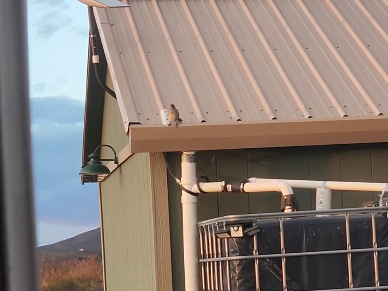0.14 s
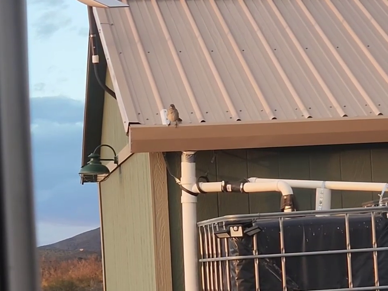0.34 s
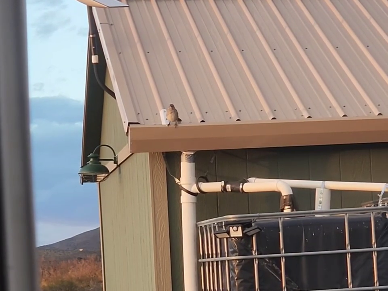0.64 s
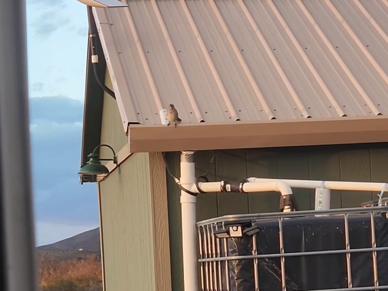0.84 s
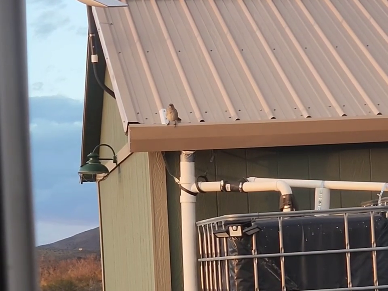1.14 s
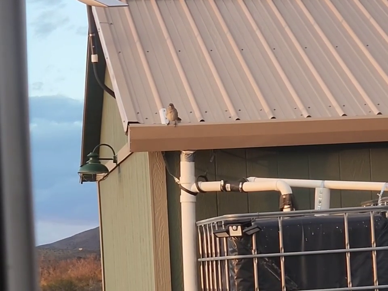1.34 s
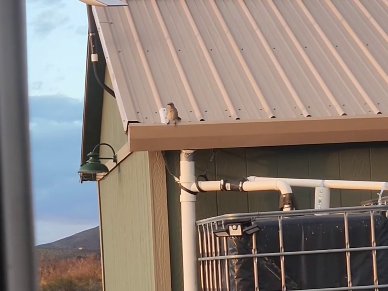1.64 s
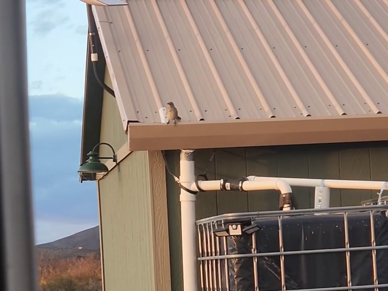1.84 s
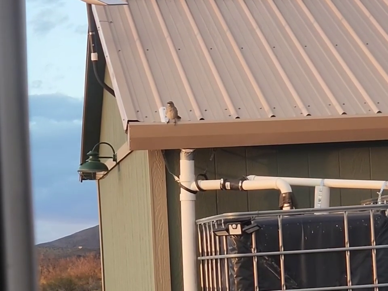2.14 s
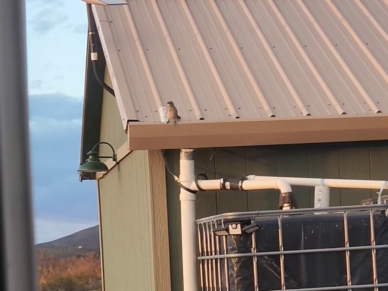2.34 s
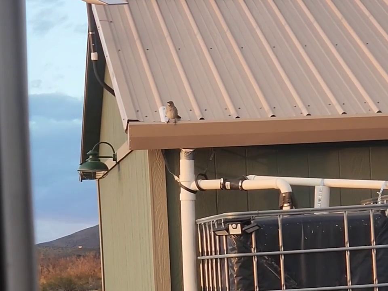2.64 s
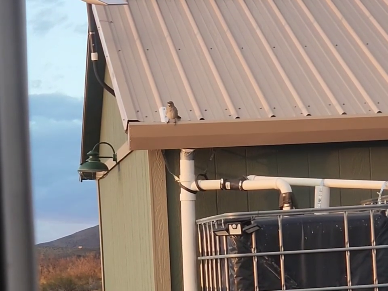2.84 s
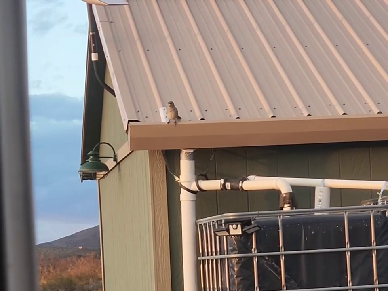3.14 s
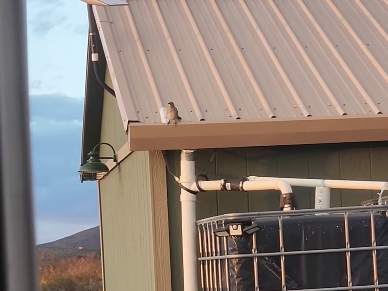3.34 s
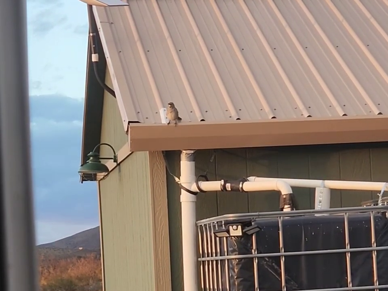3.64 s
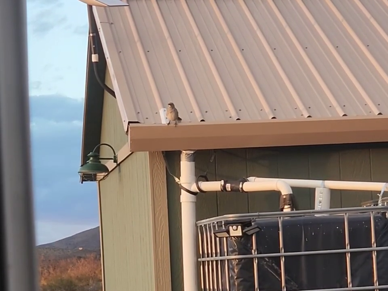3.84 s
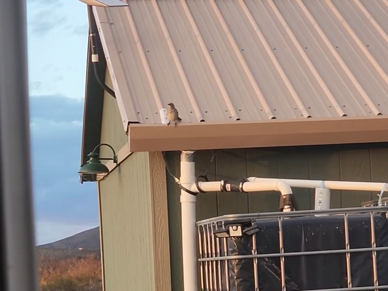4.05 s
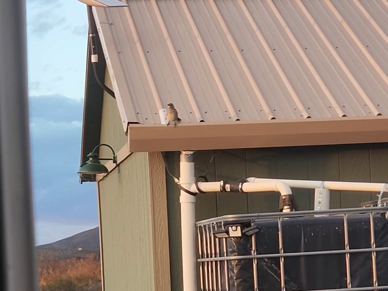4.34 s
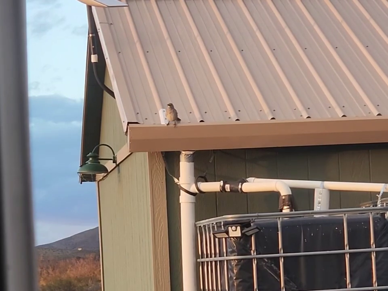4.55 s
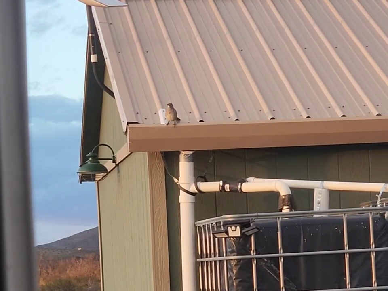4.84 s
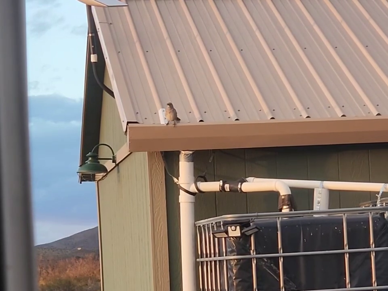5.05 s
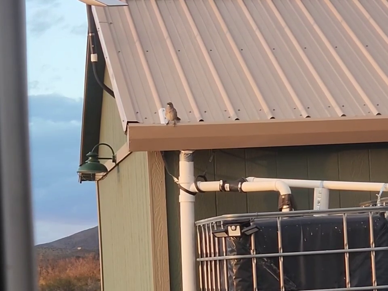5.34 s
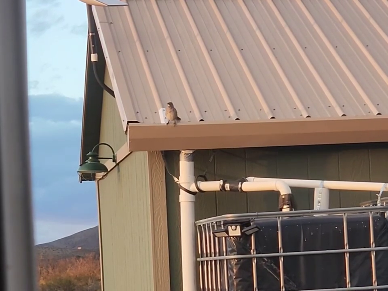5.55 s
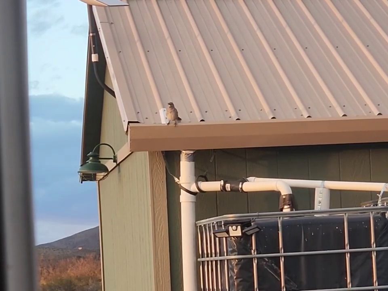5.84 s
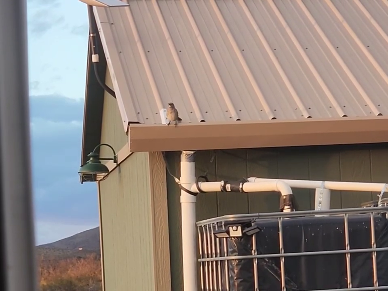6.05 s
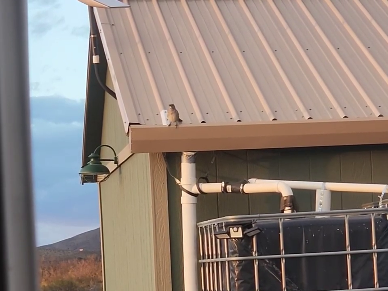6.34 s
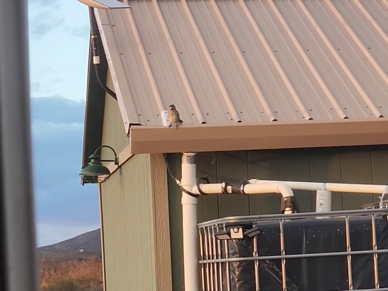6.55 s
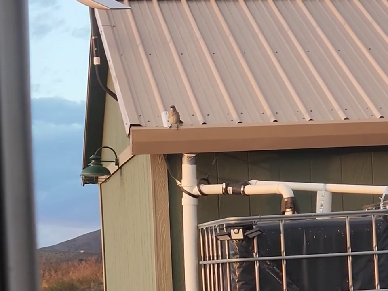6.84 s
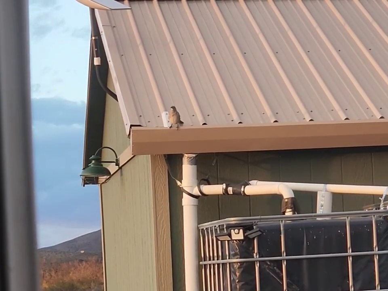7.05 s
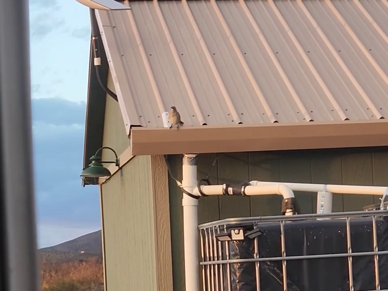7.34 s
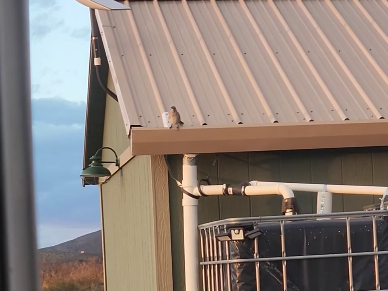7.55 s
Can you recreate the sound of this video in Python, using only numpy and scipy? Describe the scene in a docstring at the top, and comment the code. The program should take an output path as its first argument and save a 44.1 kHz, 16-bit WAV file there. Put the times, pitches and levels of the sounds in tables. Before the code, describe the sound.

Outdoors by a metal-roofed shed, wind rumbles low and unevenly on a handheld stereo microphone, over a faint 416 Hz motor hum and soft air. A thrasher starts with weak slurs and a thin high squeak at 0.2-0.5 s, then sparse short whistles; grip rustles and clicks come near 0.9 and 1.2. High peeps sound at 1.5 and 1.7, rising whistles at 2.0-2.3, tiny dry ticks at 2.4-2.55 and a strong slur at 2.9. A soft, low arched note follows at 3.1. Gusts thump as six quick flicks rattle at 3.45-3.8. From 4.25 come winding whistles and stuttered chatter; three hooked notes at 5.1-5.35 ring in calmer air. A sharp drop at 5.6, rising whistle at 5.9 and plunge at 6.05 follow, with a small rustle. A falling whistle and flick end the song near 6.65 amid gusts; then quiet hum remains until 7.7.

```python
"""A thrasher sings from the edge of a metal shed roof: gliding tones make its slurred whistles, hooked notes,
low notes, squeaks and a rattle, and short bursts of band noise surround some of its notes.
Delays and scattered reflections from the roof and nearby walls throw the song back.
Swelling low noise buffets the microphone as gusts, and the hand that holds it rustles, clicks and bumps.
Behind them a machine hums as wavering tones over a drone, in steady outdoor noise."""
import sys
import numpy as np
from scipy import signal
from scipy.fft import rfft, irfft, next_fast_len
from scipy.io import wavfile
from scipy.ndimage import uniform_filter1d

SR = 44100
rng = np.random.default_rng(int(sys.argv[2]) if len(sys.argv) > 2 else 0)


def int16_out(signal):
    """Quantize to a 16-bit WAV file."""
    q = np.round(np.clip(np.atleast_2d(signal).T, -1, 1) * 32767)
    wavfile.write(sys.argv[1], SR, q.astype(np.int16))


N = 338627  # samples
TIME = np.arange(N) / SR

# All song levels are at the beak, ahead of the reflections; spectra are in relative dB.
# Long, winding whistles, one curve each. Each row: time in seconds, pitch in Hz, level in dB.
WHISTLES = [
    [(4.278, 2115, -42), (4.286, 2000, -37.5), (4.296, 2246, -38.5), (4.316, 1966, -44),
     (4.334, 1890, -59.5), (4.364, 1997, -44.5), (4.402, 2360, -41), (4.42, 2524, -55)],
    [(5.795, 1395, -51), (5.841, 1338, -55), (5.859, 1657, -39), (5.879, 1976, -34), (5.913, 2192, -31),
     (5.941, 2197, -32), (5.961, 2264, -28), (5.978, 2445, -49)],
    [(6.535, 2456, -67), (6.543, 2472, -48), (6.555, 2216, -38.5), (6.565, 2247, -38.5), (6.573, 2026, -40),
     (6.609, 1575, -44.5), (6.633, 1608, -40.5), (6.645, 1450, -50.5)],
]
# One whistle that plunges from high to low. Each row: time in seconds, pitch in Hz, level in dB.
PLUNGE = [(6.022, 4150, -57), (6.028, 4030, -52), (6.048, 3626, -43.5), (6.066, 3485, -53.5),
          (6.075, 2470, -47), (6.086, 1695, -40.5), (6.099, 1482, -49.5), (6.169, 1383, -55.5)]
# Slurred notes; two that overlap come from the two sides of the syrinx.
# Each row: start in seconds, length in seconds, start, middle and end pitch in Hz, level in dB,
# place of the loudest moment (0-1), onset in dB, ending in dB.
SLURS = [(0.183, 0.079, 1566, 1900, 2020, -59.5, 0.13, -10, -12.5),
         (0.247, 0.081, 2013, 1924, 1930, -69, .1, -2, -3),
         (.325, 0.035, 1970, 2100, 1950, -65.5, .5, 1, 2),
         (0.417, 0.04, 2494, 2120, 1925, -60.5, 0.46, -21, -4.5),
         (0.826, .044, 1900, 1706, 1536, -50, 0.2, -15, -13),
         (0.973, 0.051, 1850, 1750, 1400, -53, .3, -9, -16),
         (1.503, 0.023, 2480, 2270, 2200, -58.5, .35, -8, -11),
         (1.928, 0.063, 1480, 2140, 2630, -49.5, 0.14, -8, -27),
         (2.034, 0.13, 1723, 1886, 1894, -48, 0.21, -18, -7.5),
         (2.178, 0.055, 1905, 1848, 1830, -50.5, .6, -15, -18),
         (2.279, .07, 1523, 2070, 2506, -37, 0.61, -13.5, -20),
         (2.508, 0.023, 3900, 3310, 3150, -67, 0.7, -6, -11),
         (2.568, 0.022, 4080, 3840, 3300, -75, 0.3, -7, -8),
         (2.822, 0.053, 1610, 1990, 2270, -51.5, 0.7, -4, 3),
         (2.844, 0.1, 1638, 2136, 1834, -36.5, 0.64, -21.5, -18),
         (4.245, .02, 1780, 1830, 2050, -55.5, .6, -9, -2),
         (4.258, .021, 1766, 1380, 2090, -45.5, 1, -9.5, 0.5),
         (4.418, 0.031, 2766, 3270, 3050, -59.5, 0.4, -0.5, -2),
         (4.454, 0.027, 3420, 3590, 3480, -61, .5, -6, -4),
         (4.46, 0.023, 3160, 2830, 2880, -54.5, .2, -2, -10),
         (4.603, 0.032, 1940, 2017, 2140, -63.5, .7, -6, -1),
         (4.65, 0.04, 2270, 2300, 2000, -56.5, 1, -16, -8),
         (4.652, 0.047, 1223, 1230, 1130, -57, .5, -11.5, -18),
         (4.674, 0.07, 1563, 1692, 1620, -40, 0.28, -12.5, -7),
         (4.728, 0.025, 1320, 1244, 1200, -59.5, .5, -6, -8),
         (4.955, 0.07, 3780, 2756, 2370, -48.5, 0.29, -24.5, -5.5),
         (4.965, 0.026, 1950, 2110, 2100, -62.5, .5, -11, -18),
         (5.021, .012, 2440, 3200, 4380, -45.5, .45, -11, -15),
         (5.597, 0.011, 1190, 1910, 3060, -44, 0.58, -19, -20),
         (5.613, .022, 2596, 1652, 1230, -36, 0.16, -16, -20),
         (5.722, 0.061, 2060, 2190, 2280, -69, .5, -0.5, -4),
         (5.779, 0.038, 3430, 3486, 3450, -66.5, 0, 1, -17),
         (5.912, .038, 5480, 5520, 5520, -69, .5, -4, -4),
         (6.158, .025, 2510, 2455, 2380, -58, 0, -3, -22.5),
         (6.513, 0.019, 2290, 2620, 2680, -61.5, .8, -7, -2.5)]
# Arched notes that end in an upward whip. Each row: start in seconds, length of the arch in seconds,
# pitch in Hz, level in dB, onset in dB, whip level in dB.
HOOKS = [(5.068, 0.06, 2253, -33, -8, -51.5), (5.171, .073, 1992, -37.5, -5.5, -48.5),
         (5.298, 0.059, 1943, -38.5, -0.5, -49)]
# The arch they share. Each row: share of the length, share of the pitch, level in dB.
HOOK_ARCH = [(0, 0.76, -20), (.17, .91, -3.5), (.54, 1, -4), (.82, .9, 2), (1.001, .88, -1.5)]
WHIP_S, WHIP_HZ, WHIP_FALL_S, WHIP_END_HZ = 0.0093, 3745, 0.0074, 2780  # rise to the top, then fall
# High peeps with a spike in pitch. Each row: time of the spike in seconds, pitch in Hz, level in dB.
PEEPS = [(1.485, 3344, -57.5), (1.723, 3466, -55.5)]
# The spike they share, and a second voice that drops away from it.
# Each row: seconds from the spike, share of the pitch, level in dB.
PEEP_VOICES = [
    [(-.058, .97, -8.5), (-.04, 1.01, -1.5), (-.022, .97, -5), (-.01, 1.15, 2), (0, 1.55, -7.5),
     (.012, 1.26, -6), (.023, 1.06, 2.5), (.042, 1.01, -13.5)],
    [(-.004, 1.3, -1), (.013, .79, -15.5)],
]
# Dry ticks, each a very fast upsweep with noise around it.
# Each row: middle in seconds, level in dB, top pitch in Hz.
UPSWEEPS = [(2.393, -59, 2800), (2.445, -57, 2800), (2.497, -59, 2900), (2.557, -63, 3600)]
SWEEP_S, SWEEP_FOOT_HZ, SWEEP_MID_HZ = .014, 1460, 2135
# Soft low notes, whose octave the throat lifts. Each row: start in seconds, length in seconds,
# start, middle and end pitch in Hz, level in dB, place of the loudest moment (0-1), onset and ending in dB.
LOW_NOTES = [(1.069, 0.14, 1060, 1211, 1170, -70, .4, -9, -6),
             (2.748, 0.087, 878, 1026, 1200, -68.5, 1, -9.5, 0.5),
             (3.077, .248, 861, 1266, 980, -56, .75, -20, -13)]
# Thin, fluttering squeaks. Each row: start in seconds, length in seconds,
# start, middle and end pitch in Hz, level in dB, place of the loudest moment (0-1), onset and ending in dB.
SQUEAKS = [(.362, 0.076, 6850, 7470, 8600, -47, .25, -20, -11.5),
           (5.149, 0.039, 6430, 6690, 7000, -57.5, .5, -10.5, -13),
           (5.153, .052, 7050, 7370, 7400, -69, .55, -11, -5)]
# Quick flicks up and down in pitch; six in a row make the rattle. Each row: time at the top in seconds,
# level in dB, length in seconds, top and foot pitch in Hz, surrounding noise in dB.
FLICKS = [(3.463, -40, .022, 2401, 1195, -44), (3.531, -40, 0.019, 2390, 1205, -47),
          (3.598, -38.5, .018, 2413, 1190, -43), (3.66, -41.5, 0.02, 2417, 1210, -43.5),
          (3.7285, -42, 0.021, 2425, 1178, -46), (3.804, -39.5, 0.02, 2413, 1187, -43),
          (4.738, -52.5, .032, 2352, 1947, -52.5), (6.651, -43.5, .022, 2210, 1292, -49)]
# Chatter, stuttered notes of both voices at once.
# Each row: time in seconds, upper pitch in Hz, its level in dB, lower pitch in Hz, its level in dB.
CHATTER = [(4.501, 3310, -59.5, 2310, -58), (4.523, 2930, -51.5, 1696, -50.5),
           (4.54, 2970, -56.5, 1738, -53), (4.559, 3000, -54.5, 1674, -54)]
# Strength of the octave: the throat rings near 2 kHz and lifts it for low notes only.
# Each row: pitch in Hz, octave in dB.
THROAT = [(850, 18.5), (980, 11), (1120, -0.5), (1200, -6), (1255, -6.5), (1400, -24.5), (1650, -28.5),
          (1950, -33), (2250, -41), (2600, -54.5), (3500, -32.5), (7500, -34)]
# The wider the beak opens, the more of the whistles' octave gets out.
# Each row: time in seconds, change of the octave in dB.
BEAK = [(1.1, -9.5), (1.4, -3), (1.7, 10), (1.9, -17.5), (4.5, -16.5), (4.65, -3.5), (5.1, 1), (6.0, -1.5),
        (6.5, -3.5)]
# Bursts of band noise around some notes.
# Each row: middle in seconds, level in dB, length in seconds, centre in Hz.
NOISE_BURSTS = [(1.966, -61.5, 0.058, 2090), (1.995, -71, .025, 2920), (2.338, -55, 0.074, 2130),
                (2.348, -66, .03, 2840), (4.435, -57, 0.046, 3000), (4.505, -60, 0.094, 3190),
                (4.51, -67, 0.11, 2320), (4.48, -70.5, .1, 3750), (5.626, -41.5, .056, 2010),
                (5.972, -68, .03, 3150), (6.539, -58, 0.036, 2550), (6.59, -63.5, 0.066, 2050)]
# Spectrum of the bursts. Each row: offset from the centre in Hz, density in dB per Hz.
BURST_SPECTRUM = [(-1500, -50.5), (-1050, -27.5), (-800, -12), (-300, 1), (102, 10.5), (413.5, -3.5),
                  (647.5, -26.5), (1404, -27.5), (1998.5, -50.5), (6005.5, -73.5)]
# The noise around flicks and upsweeps: its centre, its length per flick, its level and length per upsweep.
NOISE_HZ, FLICK_NOISE_STRETCH, SWEEP_NOISE_DB, SWEEP_NOISE_S = 2024, 1.7, -1, 0.027
# Reflections from roof and walls. Each row: delay left in seconds, delay right in seconds, level in dB.
ECHOES = [(.00211, 0.000832, -24), (.00413, .00388, -7), (.00617, 0.0071, -9), (.00821, 0.0076, -12),
          (.01617, .01476, -23), (.01871, 0.014, -17), (.0250, 0.032, -19), (.0650, 0.087, -27.5)]
NEAR_T60, FAR_T60 = .18, .5  # seconds for the scatter to die away
# Strong gusts at the microphone. Each row: middle in seconds, rumble in dB, length in seconds,
# flutter in dB, left minus right in dB.
GUSTS = [(.08, -35, .1, -48, -8.5), (0.187, -28, 0.083, -35.5, 7.5), (0.355, -29, 0.089, -35.5, 2),
         (0.521, -30, 0.11, -49.5, -2.5), (0.821, -44, 0.073, -53, 13), (1.05, -41, 0.38, -60.5, 11),
         (1.274, -29, .09, -46, 4.5), (1.51, -37.5, 0.059, -61, 9), (1.683, -37.5, 0.19, -61, 9),
         (1.895, -34, .13, -48, 4), (2.321, -43, .08, -60, 7.5), (2.488, -43.5, 0.053, -61, 11),
         (2.815, -40.5, 0.15, -62, 7.5), (3.041, -38, 0.12, -57, 10.5), (3.428, -35, 0.045, -51.5, 13),
         (3.521, -28, 0.081, -43, 9.5), (3.598, -29.5, 0.046, -53, -8.5), (3.718, -30.5, 0.06, -45, 10),
         (3.917, -30.5, 0.22, -45, 6), (4.182, -35.5, 0.038, -61, 11.5), (4.426, -38, 0.17, -50, 11.5),
         (6.046, -45, 0.1, -55, 8), (6.489, -37.5, 0.18, -50.5, 15.5), (6.629, -37.5, .08, -48, -4),
         (6.748, -36, 0.13, -38, 6), (6.937, -34, 0.15, -44.5, -0.5), (7.529, -53, 0.084, -68, 6)]
# Strength of the breeze at the microphone. Each row: time in seconds, rumble in dB.
BREEZE = [(0, -36), (.7, -46), (1.95, -43.5), (2.15, -54), (3.3, -47), (3.8, -41), (4.5, -52.5),
          (4.75, -56.5), (5.7, -63.5), (6.3, -49), (6.7, -34.5), (7.2, -60), (7.68, -60.5)]
# Flutter at 0 dB of rumble, its dB per dB of rumble, and left minus right in dB.
BREEZE_FLUTTER_DB, BREEZE_FLUTTER_SLOPE, BREEZE_LEFT_DB = -43.5, 0.48, 0.5
PUFF_HZ, PUFF_DB = 15, 2  # the breeze comes in random puffs, different at each port
# Spectrum of the wind's deep rumble. Each row: frequency in Hz, density in dB per Hz.
RUMBLE_SPECTRUM = [(10, -38.5), (22, -7), (43, 4.5), (66, 2.5), (95, -7.5), (125, -27.5), (250, -81.5),
                   (900, -140)]
# Spectrum of the wind's quicker flutter. Each row: frequency in Hz, density in dB per Hz.
FLUTTER_SPECTRUM = [(60, -29.5), (90, -1.5), (112, -1.5), (140, -9.5), (190, -19.5), (260, -32.5),
                    (400, -39), (900, -72.5), (3000, -130)]
# Rustles of the hand on the microphone. Each row: middle in seconds, level in dB, length in seconds.
RUSTLES = [(0.872, -77, 0.2), (1.10, -77, .07), (1.204, -71.5, 0.07), (1.273, -68, 0.088),
           (1.725, -78, 0.12), (6.028, -62.5, 0.017), (6.067, -59.5, 0.03), (6.094, -70.5, 0.16)]
# Spectrum of rustles and clicks. Each row: frequency in Hz, density in dB per Hz.
RUSTLE_SPECTRUM = [(200, 7.5), (700, 0.5), (1500, 7), (3500, -6.5), (5300, -1.5), (6300, -17), (8700, -7),
                   (10300, -19.5), (12500, -11.5), (16000, -15.5)]
# Small clicks of the grip. Each row: start in seconds, level in dB.
GRIP_CLICKS = [(0.2008, -80), (0.854, -80), (.897, -71), (1.21, -67), (1.231, -62), (1.276, -66),
               (6.39, -69), (6.832, -76)]
# Low bumps on the microphone. Each row: middle in seconds, peak level in dB, pitch in Hz.
BUMPS = [(0.35, -41, 86), (0.358, -39, 192), (.853, -51.5, 855), (0.895, -54.5, 835), (1.232, -64, 850),
         (1.276, -60, 810), (2.312, -41, 55), (6.028, -45.5, 48.4)]
# Machine tones. Each row: frequency in Hz, level in dB, width of the wavering in Hz.
HUM = [(416, -58.5, 0.26), (359.7, -67.5, 7.4), (125, -70.5, 8), (793, -88.5, 7.7)]
# Spectrum of the machine's drone. Each row: frequency in Hz, density in dB per Hz.
DRONE_SPECTRUM = [(25, -9), (60, -3), (130, -4.5), (200, -13), (300, -9.5), (400, -7), (500, -23),
                  (700, -30), (1200, -68)]
# Spectrum of the steady outdoor background. Each row: frequency in Hz, density in dB per Hz.
AIR_SPECTRUM = [(280, -33), (480, -0.5), (620, -10), (800, -12), (1100, -17), (1600, -16.5), (2500, -24.5),
                (3500, -25), (5500, -28.5), (6100, -34), (9200, -35.5), (10300, -41), (12000, -34.5),
                (16000, -33.5)]
AIR_DB = -72
EDGE_HZ = 15750  # top of the recorder's band


def bird():
    """The whole song, close to the beak: the sum of tones from both sides of the syrinx."""
    song = np.zeros(N)
    for rows in whistled():
        beak_db = np.interp(rows[0][0], *np.transpose(BEAK))
        add(song, *syllable(rows, flutter=.005, flutter_hz=250, beak_db=beak_db))
    for row in LOW_NOTES:
        beak_db = np.interp(row[0], [1.1, 2.7], [-6, 1])
        add(song, *syllable(slur(*row, flatness=3), flutter=.002, flutter_hz=150, beak_db=beak_db))
    for row in SQUEAKS:
        s, squeak = syllable(slur(*row), flutter=0.011, flutter_hz=495.5)
        add(song, s, squeak)
        add(song, s + .072, amp(-17) * squeak)  # high notes beam at a far wall and come back
    for *row, _ in FLICKS:
        add(song, *syllable(flick(*row), flutter=0.011, flutter_hz=510, beak_db=-16.5))
    for s, upper_hz, upper_db, lower_hz, lower_db in CHATTER:
        add(song, *syllable(stutter(s, upper_hz, upper_db), flutter=0.046, flutter_hz=700))
        add(song, *syllable(stutter(s, lower_hz, lower_db), flutter=0.018, flutter_hz=700))
    return song


def syllable(rows, flutter, flutter_hz, beak_db=0, fade_s=0.0029):
    """One side of the syrinx: a gliding, slightly unsteady tone and its octave; returns start and sound."""
    s, pitch, level_db = np.transpose(rows)
    s = np.sort(s)
    t = np.arange(s[0] - fade_s, s[-1] + fade_s, 1 / SR)
    glide = uniform_filter1d(np.interp(t, s, pitch), size=130)  # rounds the corners
    hz = glide * (1 + flutter * wander(len(t), flutter_hz))
    phase = 2 * np.pi * np.cumsum(hz) / SR
    octave = amp(read(THROAT, hz) + beak_db) * np.sin(2 * phase)
    tone = np.sqrt(2) * (np.sin(phase) + octave)
    to_edge = np.minimum(t - t[0], t[-1] - t)
    gate = np.sin(np.pi / 2 * np.clip(to_edge / (2 * fade_s), 0, 1)) ** 2
    return t[0], gate * amp(np.interp(t, s, level_db)) * tone


def whistled():
    """The contours of all the clear notes, each as rows of time, pitch and level."""
    peeps = []
    for s, hz, db in PEEPS:
        for voice in PEEP_VOICES:
            peeps.append([(s + lag, share * hz, db + voice_db) for lag, share, voice_db in voice])
    sweeps = [slur(s - SWEEP_S / 2, SWEEP_S, SWEEP_FOOT_HZ, SWEEP_MID_HZ, top_hz, db,
                   loudest=0.56, onset_db=-9, ending_db=-13)
              for s, db, top_hz in UPSWEEPS]
    slurs = [slur(*row) for row in SLURS]
    hooks = [hook(*row) for row in HOOKS]
    return [*WHISTLES, PLUNGE] + slurs + hooks + peeps + sweeps


def slur(s, length, start_hz, middle_hz, end_hz, db, loudest, onset_db, ending_db, flatness=2):
    """The contour of a note that glides along one bow while its level follows an onset and an ending."""
    u = np.linspace(0, 1, 41)
    bow = (middle_hz - (start_hz + end_hz) / 2) * (1 - abs(2 * u - 1) ** flatness)
    loudest = np.clip(loudest, .03, .97)
    onset = onset_db * (1 - u / loudest) ** 2
    ending = ending_db * ((u - loudest) / (1 - loudest)) ** 2
    fade = np.where(u < loudest, onset, ending)
    return np.transpose([s + u * length, start_hz + u * (end_hz - start_hz) + bow, db + fade])


def hook(s, length, hz, db, onset_db, whip_db):
    """The contour of an arched note whose pitch whips up at its close and falls back."""
    arch = [(s + u * length, share * hz, db + arch_db + onset_db * (1 - u)) for u, share, arch_db in HOOK_ARCH]
    top = s + length + WHIP_S
    return arch + [(top, WHIP_HZ, whip_db), (top + WHIP_FALL_S, WHIP_END_HZ, whip_db)]


def flick(s, db, length, top_hz, foot_hz, foot_db=-12):
    """The contour of one flick: pitch straight up and down again."""
    half_hz = (foot_hz + top_hz) / 2
    return [(s - length / 2, foot_hz, db + foot_db), (s - length / 4, half_hz, db), (s, top_hz, db),
            (s + length / 4, half_hz, db), (s + length / 2, foot_hz, db + foot_db)]


def stutter(s, hz, db, half_s=0.0037, lift=1.15, edge_db=-8):
    """The contour of one chatter note: a quick drop in pitch, then a hold, loudest where the drop ends."""
    return [(s - half_s, hz * lift, db + edge_db), (s, hz, db), (s + half_s, hz, db + edge_db)]


def note_noise():
    """Short swells of band noise surround the flicks, upsweeps and some other notes."""
    out = np.zeros((2, N))
    for s, db, length, centre_hz in noise_moments():
        t = np.arange(-2 * length, 2 * length, 1 / SR)
        swell = np.exp(-(2 * t / length) ** 2)
        unevenness = evened(amp(1.1 * wander(len(t), 180)))  # the noise flutters unevenly
        band = [(max(centre_hz + offset_hz, 1), band_db) for offset_hz, band_db in BURST_SPECTRUM]
        add(out, s + t[0], amp(db) * swell * unevenness * noise(band, likeness=0.22, n=len(t)))
    return out * panned(1.3)


def noise_moments():
    """Every burst of band noise: (middle in seconds, level in dB, length in seconds, centre in Hz)."""
    flicks = [(s, noise_db, FLICK_NOISE_STRETCH * length, NOISE_HZ) for s, _, length, _, _, noise_db in FLICKS]
    sweeps = [(s, db + SWEEP_NOISE_DB, SWEEP_NOISE_S, NOISE_HZ) for s, db, _ in UPSWEEPS]
    return NOISE_BURSTS + flicks + sweeps


def yard(song, direct_db=-1, near_db=-16, far_db=-32):
    """The direct path, single reflections, scatter from the shed and a faint tail from the land around."""
    near = amp(near_db) * scatter(NEAR_T60, start_s=0.0056)
    far = amp(far_db) * scatter(FAR_T60, start_s=0.029)
    response = near + far
    response[[0, 1], [0, 3]] += amp(direct_db)  # reaches the right port three samples later
    for left_s, right_s, db in ECHOES:
        response[0, round(left_s * SR)] += amp(db)
        response[1, round(right_s * SR)] += amp(db)
    return signal.fftconvolve(song[None], response, axes=1)[:, :N] * panned(1.4)


def scatter(t60, start_s):
    """A decaying tail of sparse reflections of energy 1, different in each channel."""
    t = np.arange(SR // 2) / SR
    signs = rng.choice([-1., 1.], (2, len(t)))
    taps = signs * (rng.random((2, len(t))) < 3000 / SR)  # about 3000 reflections a second
    taps = taps * amp(-60 * t / t60) * (t > start_s)
    return taps / np.linalg.norm(taps, axis=1, keepdims=True)


def wind():
    """A puffy breeze and single gusts drive a deep rumble and a quicker flutter, uneven between the ports."""
    breeze_db = np.interp(TIME, *np.transpose(BREEZE))
    puffs = amp(PUFF_DB * np.array([wander(N, PUFF_HZ), wander(N, PUFF_HZ)])) * panned(BREEZE_LEFT_DB)
    rumble_power = (puffs * amp(breeze_db)) ** 2
    flutter_power = (puffs * amp(BREEZE_FLUTTER_DB + BREEZE_FLUTTER_SLOPE * breeze_db)) ** 2
    for s, rumble_db, length, flutter_db, left_db in GUSTS:
        gust = (swells([(s, 0, length)]) * panned(left_db)) ** 2
        rumble_power += amp(rumble_db) ** 2 * gust
        flutter_power += amp(flutter_db) ** 2 * gust
    rumble = np.sqrt(rumble_power) * eddies(RUMBLE_SPECTRUM, likeness=0.54)
    flutter = np.sqrt(flutter_power) * eddies(FLUTTER_SPECTRUM, likeness=0.29)
    return rumble + flutter


def eddies(spectrum, likeness):
    """Turbulence at the two microphone ports, without a slow swell of its own."""
    swirl = noise(spectrum, likeness)
    return swirl / np.sqrt(uniform_filter1d(swirl.mean(0) ** 2, size=4000))


def hand():
    """Grip on the microphone: grainy noise rustles, tiny decaying clicks and dull bumps of a few turns."""
    rub = swells(RUSTLES) * amp(2.0 * wander(N, 150))
    for s, db in GRIP_CLICKS:
        add(rub, s, amp(db) * np.exp(-TIME[:2000] / 0.0038))
    out = noise(RUSTLE_SPECTRUM, likeness=.3) * rub * panned(1.5)
    for s, db, hz in BUMPS:
        turns = np.arange(-2, 2, hz / SR)
        add(out, s - 2 / hz, -amp(db) * np.cos(2 * np.pi * turns) * np.exp(-(turns / 1.2) ** 2))
    return out


def machine():
    """A steady motor tone and weaker wavering ones over a low drone of noise."""
    tones = np.zeros(N)
    for hz, db, width in HUM:
        phase = 2 * np.pi * np.cumsum(hz + width * wander(N, 12)) / SR
        tones += amp(db) * np.sqrt(2) * np.sin(phase)
    return tones * panned(-0.55) + amp(-60) * noise(DRONE_SPECTRUM, likeness=0.6)


def air():
    """The steady outdoor background: shaped noise, nearly unlike in the two channels."""
    return amp(AIR_DB) * noise(AIR_SPECTRUM, likeness=0.035)


def noise(spectrum, likeness, n=N):
    """Two partly alike channels of noise with the given spectrum, scaled together to rms 1."""
    size = next_fast_len(n)
    colour = amp(read(spectrum, np.fft.rfftfreq(size, 1 / SR)))
    a, b = irfft(rfft(rng.standard_normal((2, size))) * colour, size)[:, :n]
    c = np.clip(likeness, -1, 1)
    return evened(np.array([a, c * a + np.sqrt(1 - c * c) * b]))


def wander(n, hz):
    """Smooth random motion of rms about 1, its spectrum falling off as a bell towards and beyond hz."""
    f = np.fft.rfftfreq(n + SR, 1 / SR)
    smooth = irfft(rfft(rng.standard_normal(n + SR)) * np.exp(-(f / hz) ** 2))
    return evened(smooth)[:n]


def swells(rows):
    """A gain curve with one smooth swell for each row (middle in seconds, dB, length in seconds)."""
    return sum(amp(db) * np.exp(-(2 * (TIME - s) / length) ** 2) for s, db, length in rows)


def read(points, hz):
    """Reads a table of (Hz, value) along a log-frequency axis."""
    f, value = np.transpose(points)
    return np.interp(np.log(hz + 1), np.log(f + 1), value)


def panned(left_db):
    """Channel gains for a left-minus-right level difference in dB."""
    return amp([[left_db / 2], [-left_db / 2]])


def add(mix, s, sound):
    """Mixes a sound in at s seconds."""
    part = mix[..., max(round(s * SR), 0):][..., :sound.shape[-1]]
    part += sound[..., :part.shape[-1]]


def evened(x):
    """Scales to rms 1."""
    return x / np.sqrt(np.mean(x ** 2) + 1e-20)


def amp(db):
    """Amplitude for a level in dB."""
    return 10 ** (np.asarray(db) / 20)


def scene():
    """The bird in its yard, band noise around its notes, then wind, hand, machine and outdoor air."""
    return yard(bird()) + note_noise() + wind() + hand() + machine() + air()


def record(dry):
    """The recorder's band limit: a steep low-pass."""
    low_pass = signal.firwin(511, EDGE_HZ, window=("kaiser", 9), fs=SR)
    return signal.oaconvolve(dry, low_pass[None], "same")


dry = scene()
out = record(dry)
int16_out(out)
```